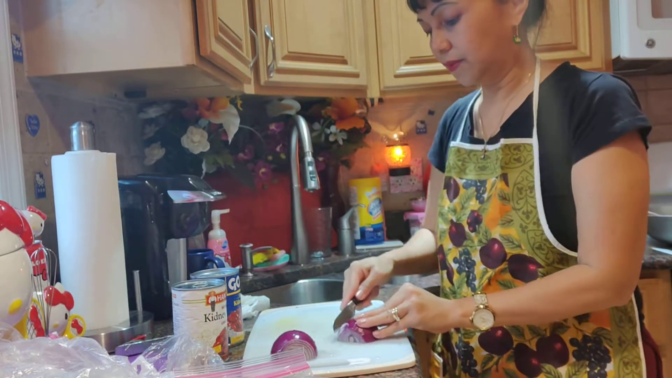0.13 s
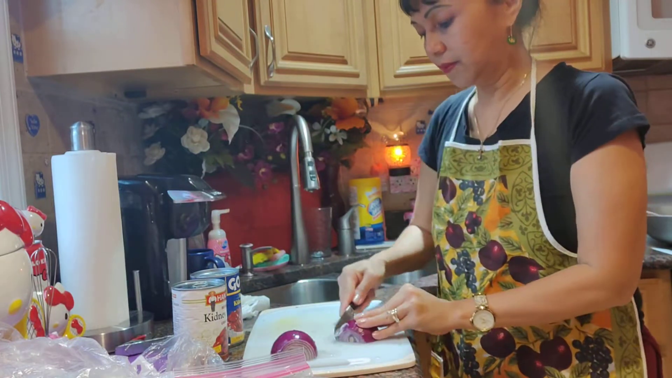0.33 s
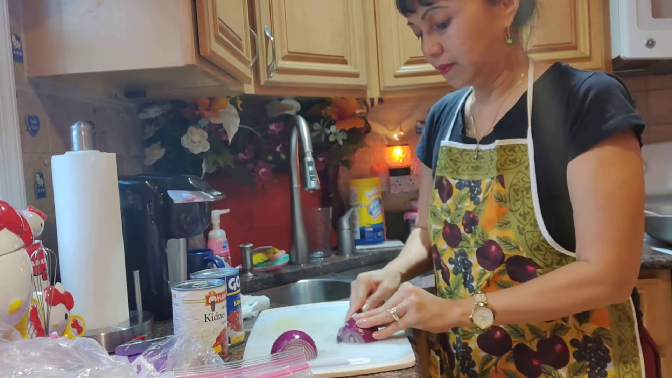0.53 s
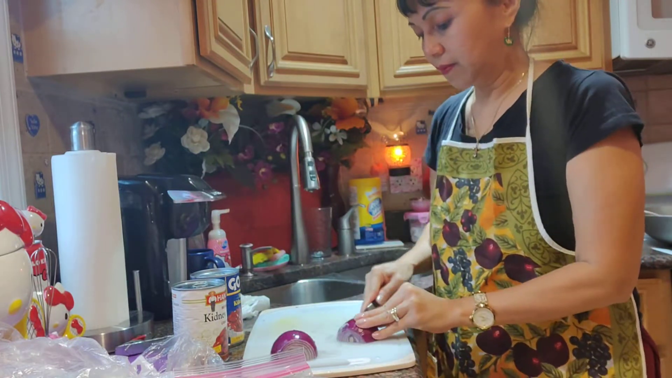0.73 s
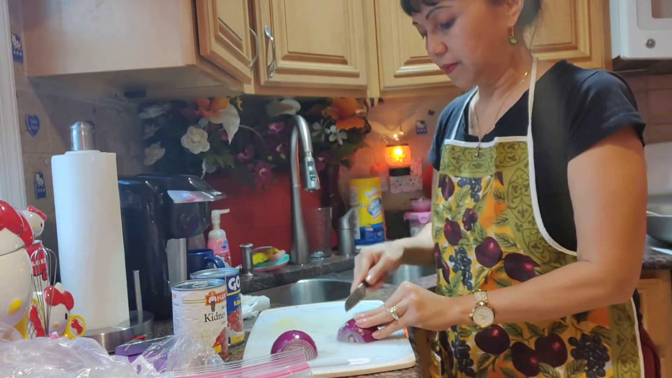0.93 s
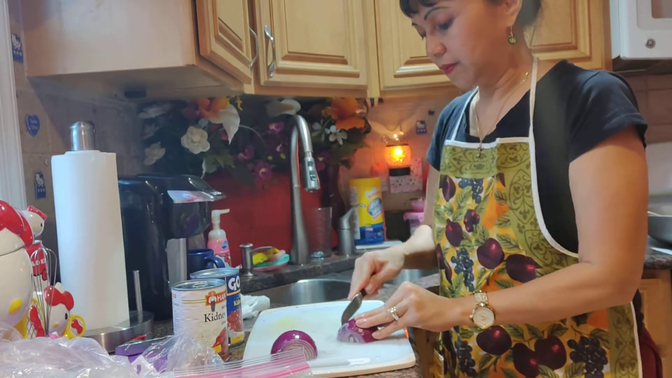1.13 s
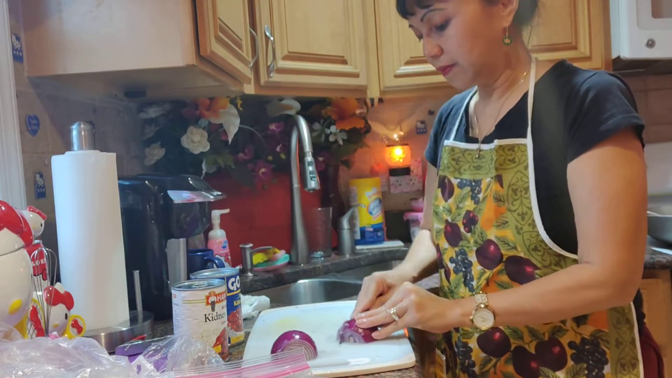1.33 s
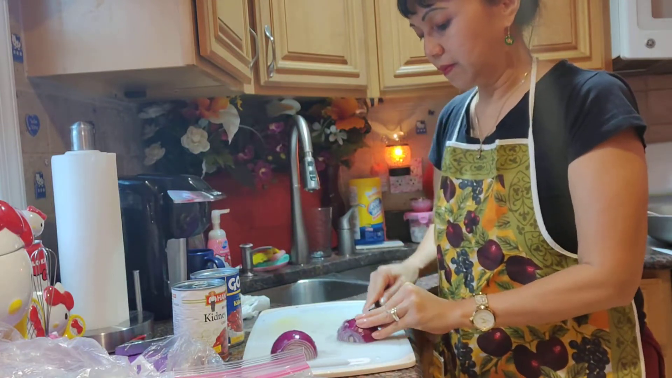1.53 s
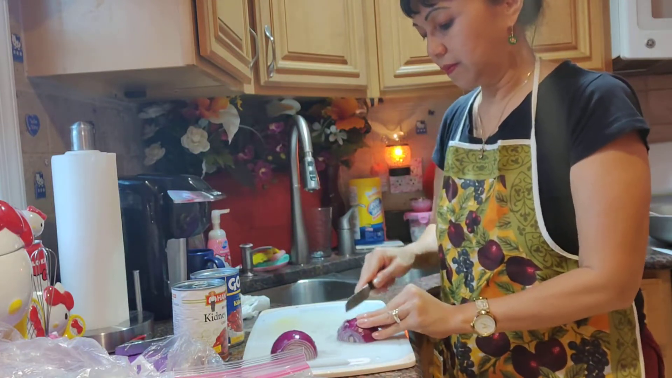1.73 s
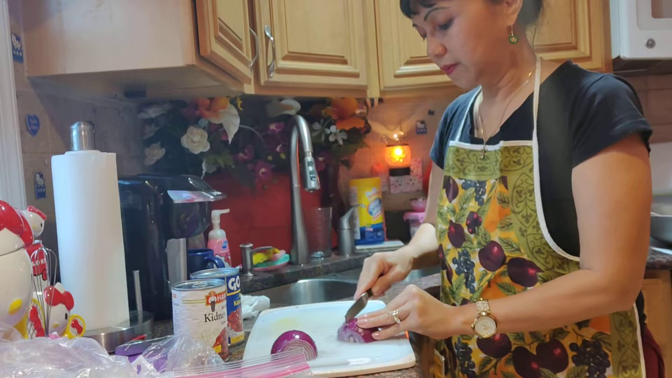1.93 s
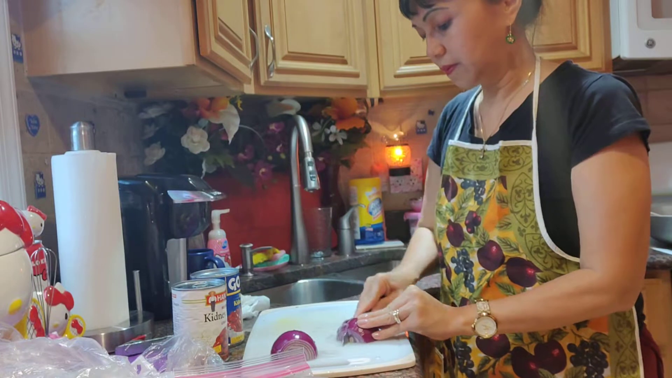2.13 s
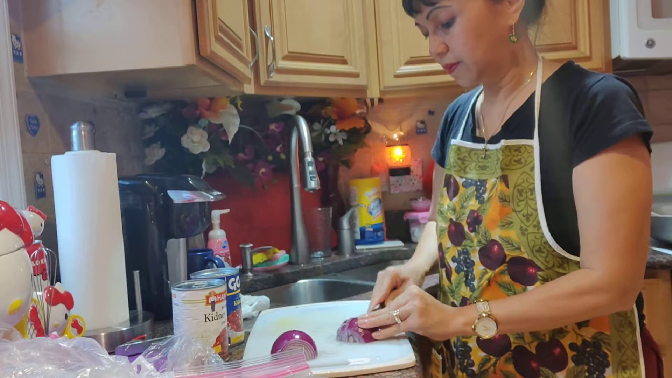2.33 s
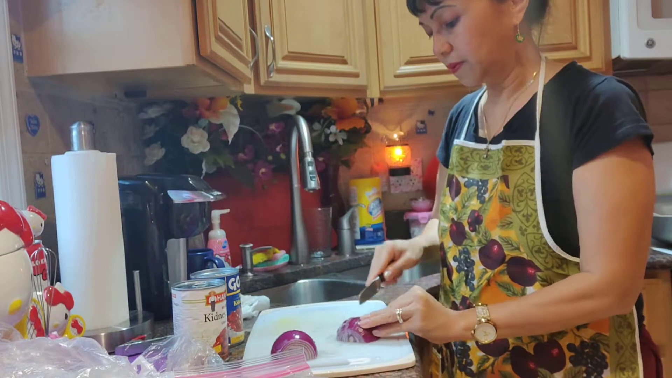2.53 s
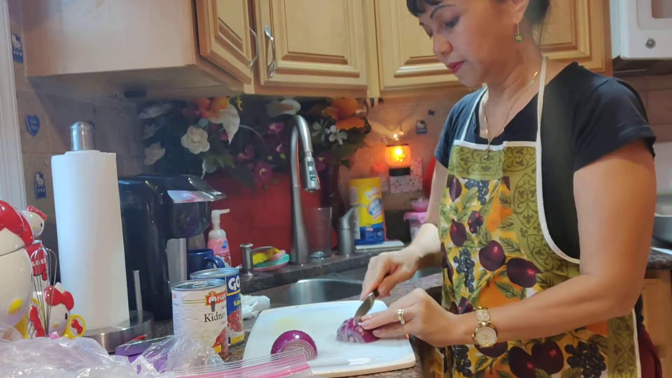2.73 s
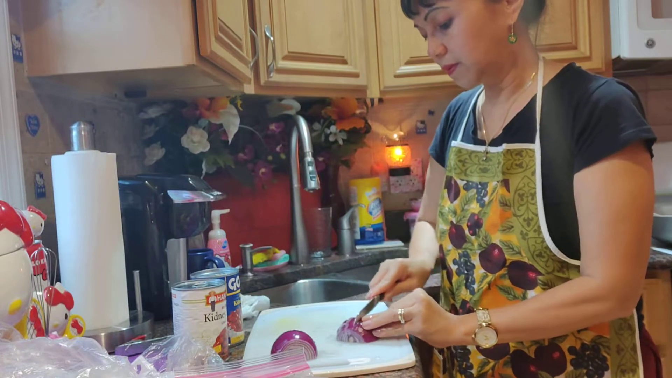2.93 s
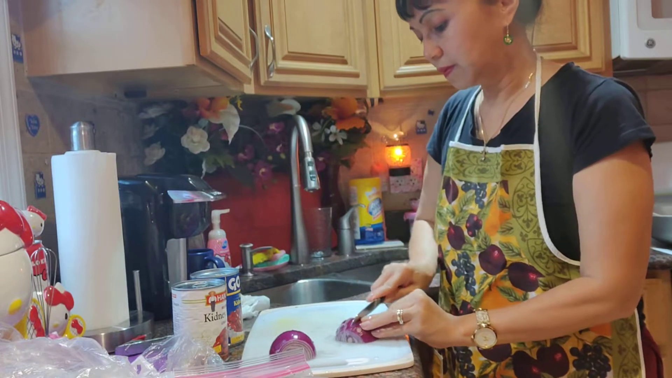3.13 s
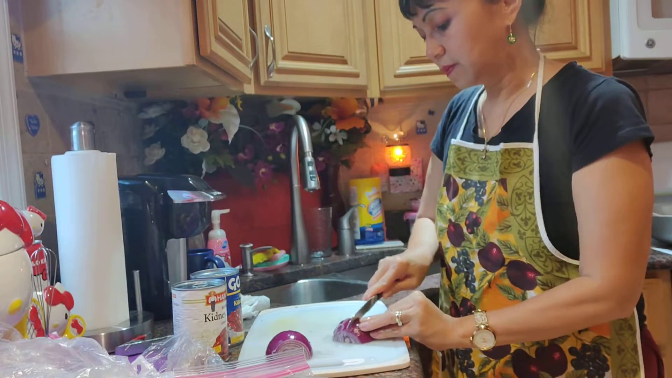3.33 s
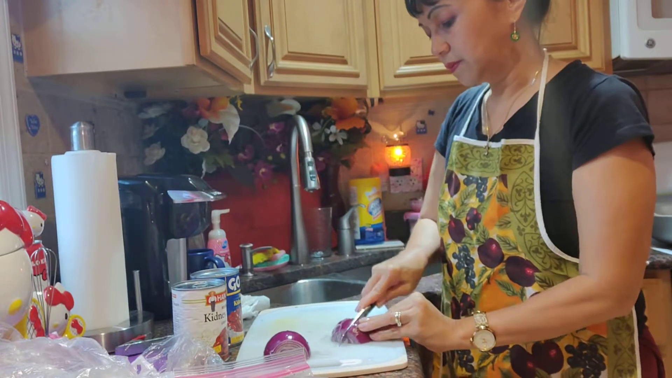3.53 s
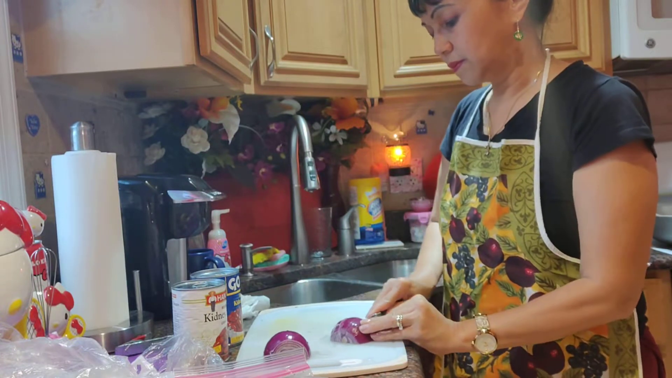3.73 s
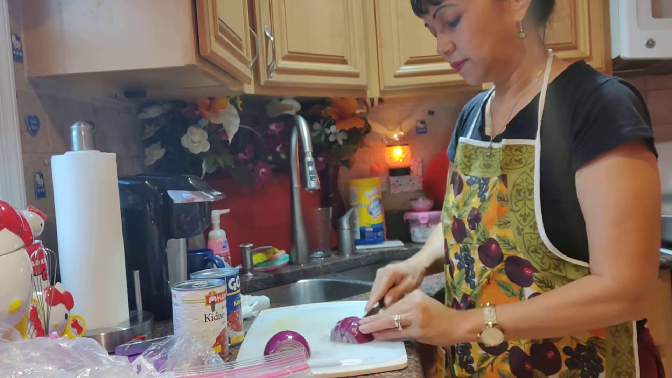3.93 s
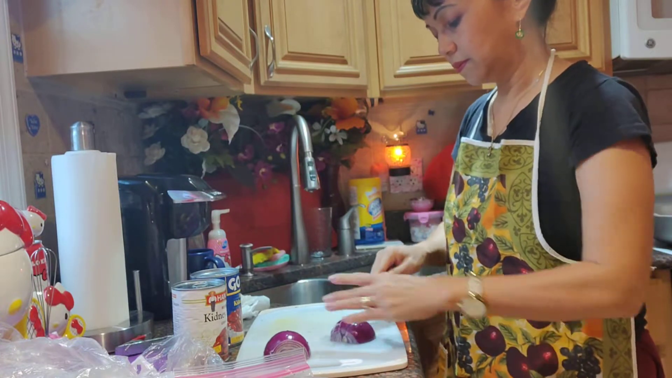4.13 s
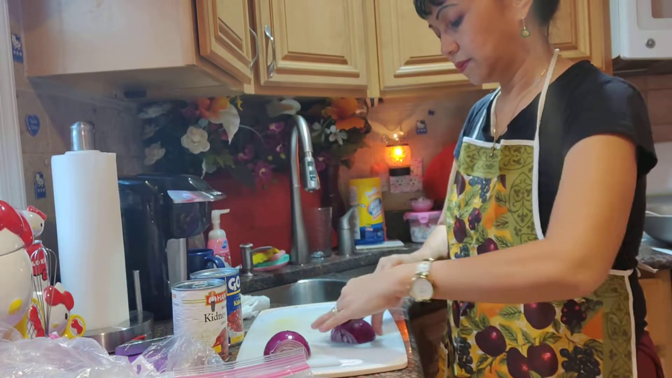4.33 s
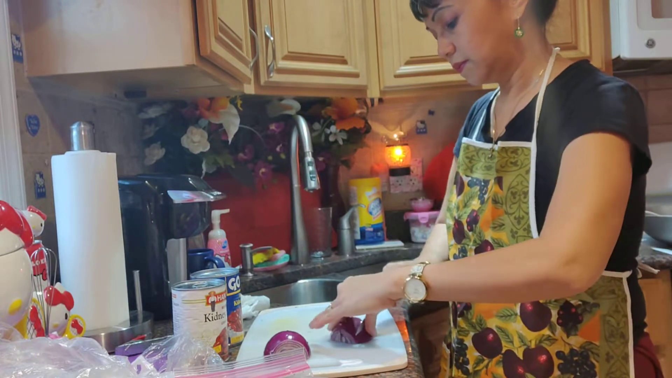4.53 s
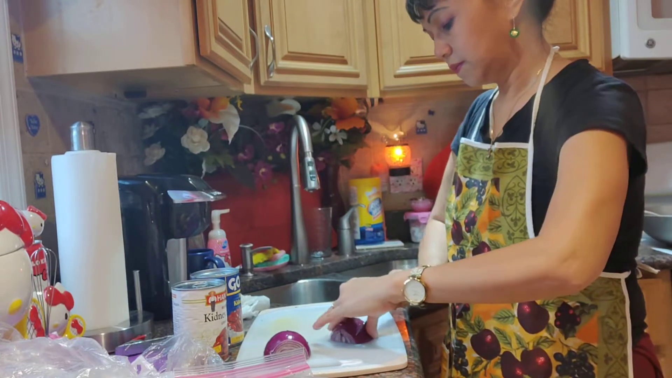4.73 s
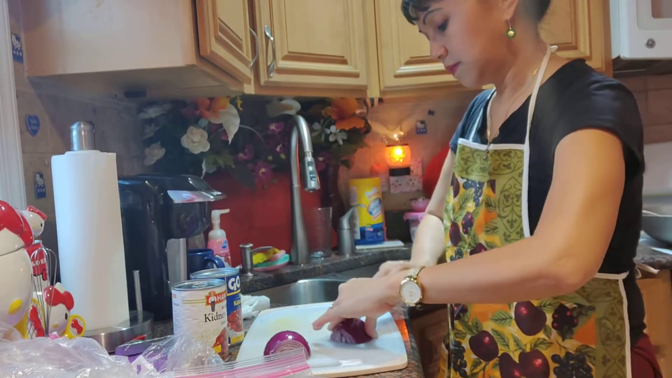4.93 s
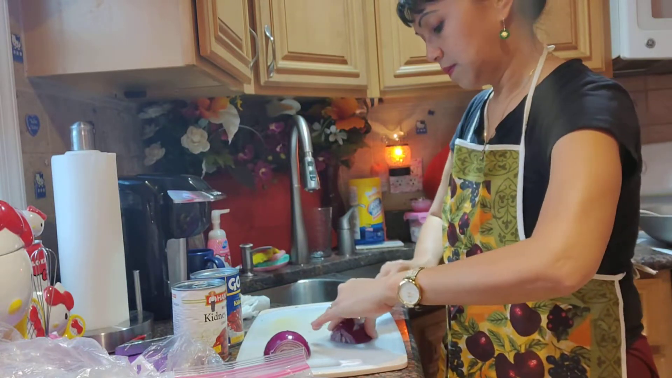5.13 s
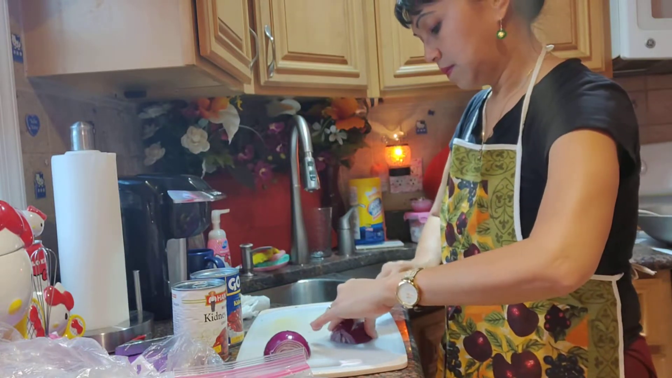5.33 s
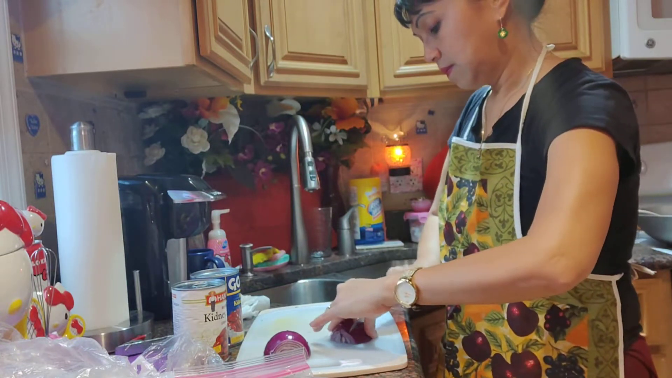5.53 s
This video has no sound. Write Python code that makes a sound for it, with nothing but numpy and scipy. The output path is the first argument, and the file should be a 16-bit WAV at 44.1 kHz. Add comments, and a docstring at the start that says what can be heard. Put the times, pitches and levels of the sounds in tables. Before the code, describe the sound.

Four spaced onion slices snap, crunch and knock on a cutting board, then small faint contacts follow over quiet hum and hiss.

```python
"""Faint contacts are heard first, over a low hum and hiss; then a knife slices an onion on a plastic board.
Layers snap as brief clicks with crackle, and cells burst in a crunch of small damped rings over friction noise.
The blade rings the board and drags back out as resonant friction; low thumps of the counter lie beneath.
A small hard kitchen adds echoes and a diffuse tail, heard at an arm's length by a two-port microphone."""
import sys
import numpy as np
from scipy import signal
from scipy.io import wavfile
from scipy.ndimage import uniform_filter1d

SR = 44100
rng = np.random.default_rng(int(sys.argv[2]) if len(sys.argv) > 2 else 0)


def to_wav(s):
    """Save 16-bit WAV."""
    ch = np.atleast_2d(s).T  # columns
    pcm = np.round(np.clip(ch, -1, 1) * 32767)  # PCM
    wavfile.write(sys.argv[1], SR, pcm.astype(np.int16))


N = 250929

# spectrum of the torn onion flesh: f/Hz, relative level/dB
FLESH = [(150, -21.5), (400, -5.5), (700, -5), (1200, -7), (2200, -7.5), (3100, -7), (5500, -13),
         (9000, -19.5), (15000, -23)]


def gain_of(db):
    """Level to amplitude: 20 dB is a factor of ten."""
    return 10 ** (np.asarray(db) / 20)


def evened(x):
    """Normalisation to unit root mean square."""
    return x / np.sqrt(np.mean(x ** 2) + 1e-20)


def read(points, hz):
    """Interpolation of a curve on a logarithmic frequency axis."""
    f, value = np.transpose(points)
    return np.interp(np.log(hz + 1), np.log(f + 1), value)


def add(mix, s, sound):
    """Superposition: the sound joins the mix from time s."""
    part = mix[..., round(s * SR):][..., :sound.shape[-1]]
    part += sound[..., :part.shape[-1]]


def ring(hz, width, size=1500):
    """Damped mode after a soft blow: it swells, then dies, faster for a wider resonance; peak near 1."""
    u = np.pi * width * np.arange(size) / SR
    envelope = (u / 2) ** 2 * np.exp(2 - u)
    return envelope * np.sin(2 * u * hz / width)


def colour(x, points):
    """Minimum-phase filtering: the Hilbert transform of the log spectrum gives a causal response."""
    log_gain = read(points, np.fft.rfftfreq(4096, 1 / SR)) * np.log(10) / 20
    mirrored = np.r_[log_gain, log_gain[-2:0:-1]]
    spectrum = np.exp(signal.hilbert(mirrored).conj())
    return signal.oaconvolve(x, np.fft.ifft(spectrum).real[:2048])[:len(x)]


def diffuse(frames, shape, size):
    """Diffuse field: random short-time spectra, alike left and right in the bass; shape(hz) gives the gain."""
    # left-right likeness of diffuse sound: f/Hz, correlation
    likeness = [(60, 1), (130, 0.92), (290, 0.94), (640, 0.35), (1410, -0.29), (3100, 0.014),
                (6820, -0.097), (15000, -0.26)]
    hz = np.fft.rfftfreq(size, 1 / SR)[:, None]
    a, b, c, d = rng.standard_normal((frames, len(hz), 4)).T
    same = read(likeness, hz)
    left = a + 1j * b
    right = same * left + np.sqrt(1 - same ** 2) * (c + 1j * d)
    spectra = np.array([left, right]) * shape(hz)
    return signal.istft(spectra, nperseg=size, noverlap=size * 3 // 4)[1]


def room_tone():
    """Stationary noise: appliance rumble in low room modes, under hiss; both vary a little in patches."""
    # rumble spectrum: f/Hz, relative density level/dB
    rumble = [(15, -11.5), (22, -7), (35, -14), (52, -2.5), (66, -1.5), (86, -14.5), (112, 2), (122, -1.5),
              (136, -8.5), (154, 0.3), (185, -15), (250, -12.5), (325, -12), (385, -17.5), (450, -20.5)]
    # hiss spectrum: f/Hz, relative density level/dB
    hiss = [(240, -29), (400, 1.5), (467, -8), (512, -4), (545, -4), (655, -16.5), (697, -11), (964, -11.5),
            (1220, -19), (2470, -22.5), (4110, -30.5), (4950, -27), (6050, -33), (13900, -30), (16000, -27)]
    # stereo tilt of the room tone: f/Hz, left minus right level/dB
    air_tilt = [(60, -3), (150, -2), (380, 0.5), (950, 0), (2380, 0), (5980, 1), (15000, -0.5)]
    lean = np.array([.5, -.5])[:, None, None]

    def noise(points, is_low, level_db, size, patchy_db):
        """Shaped noise on one side of 420 Hz, its level varying over frequency and time."""
        frames = 4 * N // size + 5
        patches = rng.standard_normal((frames, size // 2 + 1)).T
        patches = uniform_filter1d(patches, size=8, axis=0)
        patches = evened(uniform_filter1d(patches, size=4, axis=1))

        def shape(hz):
            inside = (hz < 420) == is_low
            return inside * gain_of(read(points, hz) + patchy_db * patches + lean * read(air_tilt, hz))
        return gain_of(level_db) * evened(diffuse(frames, shape, size=size)[:, :N])

    low = noise(rumble, True, level_db=-54, size=8192, patchy_db=1.2)
    return low + noise(hiss, False, level_db=-67, size=2048, patchy_db=.8)


def thumps():
    """Modal excitation: low thumps of the counter's modes, under the pushes and the blade's landings."""
    # low thumps: t/s, level/dB, centre of the modes reached f/Hz
    low_thumps = [(0.441, -49.5, 150), (1.292, -49, 152), (1.371, -42.5, 100.2), (1.39, -47.5, 290.7),
                  (2.119, -48.5, 150), (2.158, -41.5, 120), (2.179, -42.5, 162), (2.202, -46, 325),
                  (2.226, -49.5, 60), (3.47, -47, 153), (3.496, -41, 162), (3.524, -41, 108),
                  (3.528, -44.5, 340), (3.546, -43.5, 263.6), (3.6, -50.5, 62)]
    # counter modes: f/Hz, level/dB, nominal decay time t60/s
    modes = [(60, 0.1, 0.14), (101, 0, 0.078), (155, -1.1, 0.078), (252, -1.8, .05), (340, -1.8, .045)]
    reach_db_per_octave = 16.5
    out = np.zeros(N)
    for s, db, centre_hz in low_thumps:
        for hz, mode_db, t60 in modes:
            reach_db = -reach_db_per_octave * abs(np.log2(hz / centre_hz))
            add(out, s, gain_of(db + mode_db + reach_db) * ring(hz, 4.9 / t60, size=12000))
    return out


def drags():
    """Resonant friction: the blade drags out, its noise in one broad band that sags in pitch with the gap."""
    # flat of the blade dragging out after each slice: t/s, length/s, level/dB, pitch of the gap f/Hz
    pulls = [(.63, 0.17, -67, 1147), (1.559, .13, -67.5, 1225), (2.281, 0.211, -61, 1277),
             (3.632, 0.17, -57.5, 1212)]
    peak_at, start_db, end_db = 0.38, -8, -14.5  # share of the drag; ends relative to the peak
    gap_sag = 0.1993  # pitch drop over the drag, as a share
    out = np.zeros(N)
    for s, length, db, hz in pulls:
        u = np.arange(0, length, 1 / SR) / length
        band = rng.standard_normal(len(u)) + 1j * rng.standard_normal(len(u))
        band = signal.lfilter(*signal.butter(1, 220, fs=SR), band)
        pitch = hz * (1 - gap_sag * (u - .5))
        rub = (band * np.exp(2j * np.pi * np.cumsum(pitch) / SR)).real  # noise band moved up to the pitch
        swell_db = np.interp(u, [0, peak_at, 1], [start_db, 0, end_db])
        add(out, s, gain_of(db + swell_db) * evened(rub) * signal.windows.tukey(len(u), .3))
    return out


def knocks():
    """Impact and modal response: a short blow of the blade rings the damped plastic board."""
    # blade landings: t/s, level/dB, hardness added to modes above 2 kHz/dB
    blows = [(0.466, -34.5, -2), (1.3896, -15, 4.5), (2.1984, -24, -2), (3.5357, -29.5, 5.5),
             (3.5400, -22.5, -1)]
    # board modes: f/Hz, width/Hz, level/dB
    modes = [(1007, 370, -11), (1300, 1000, 7.5), (3400, 1100, -3.5), (4900, 1200, -8), (7090, 700, -23.5)]
    out = np.zeros(N)
    for s, db, hard_db in blows:
        blow = sum(gain_of(mode_db + hard_db * (hz > 2000)) * ring(hz, width) for hz, width, mode_db in modes)
        add(out, s, gain_of(db) * blow)
    return out


def crunch():
    """Random impulses: bursting cells of uneven size, pitch and place, over wet friction noise."""
    # crunch of slicing and pulling out, and short crackling ticks: start t/s, stop t/s,
    # fizz at start/dB, fizz at stop/dB, weight added below 2.2 kHz/dB, spray added above 10.5 kHz/dB
    crunches = [(0.341, 0.39, -65, -79, 2, 8), (0.394, 0.464, -69.5, -56, 1, 1),
                (0.594, 0.776, -77.5, -85, -3.5, -11), (1.256, 1.262, -69, -82, 11, -.4),
                (1.298, 1.376, -68, -53.5, 0.6, 1.95), (1.387, 1.424, -47, -57, -6.5, -2),
                (1.453, 1.661, -68.5, -85, 4.5, 3.5), (2.065, 2.192, -71.5, -52, -0.2, 2),
                (2.285, 2.469, -71, -83.5, -0.5, -1.3), (3.085, 3.150, -62.5, -79.5, -7.5, -4),
                (3.432, 3.43, -71, -76.5, 3, 1), (3.474, 3.52, -68, -68.5, -1, .1),
                (3.516, 3.536, -56.5, -45.5, -2.5, 4.5), (3.606, 3.680, -75.5, -61.5, 1.5, -10),
                (3.696, 3.755, -61.5, -66, -6.5, -5), (5.499, 5.522, -65, -79, -7, 3),
                (5.554, 5.636, -75.5, -89, 0, -5)]
    bite_s, settle_db_per_s = 0.0093, 301  # the fizz sets in, and dies away after the stop
    bursts_per_s = 2500
    heights = gain_of(4.3 * np.minimum(rng.exponential(1, N), 3))
    bursts = heights * (rng.random(N) < bursts_per_s / SR) * rng.choice([-1, 1], N)
    kind = rng.integers(0, 12, N)
    pitches = np.geomspace(600, 14000, num=12)
    pans = rng.uniform(-1, 1, 12) * 0.64
    cells = np.zeros((2, N))
    for k, hz in enumerate(pitches):
        pop = ring(hz, 0.67 * hz, size=300) * hz / 4000
        cells += signal.oaconvolve(bursts * (kind == k), pop)[:N] * [[1 + pans[k]], [1 - pans[k]]]
    shared, own = rng.standard_normal(N), rng.standard_normal((2, N))
    raw = evened(cells) + 0.63 * shared + 0.62 * own
    whole = np.array([colour(v, FLESH) for v in raw])
    fizz = signal.lfilter(*signal.butter(3, 7500, "high", fs=SR), whole)  # the reference for level
    body = signal.lfilter(*signal.butter(2, 2200, fs=SR), whole)
    spray = signal.lfilter(*signal.butter(3, 10500, "high", fs=SR), whole)
    t, out = np.arange(N) / SR, np.zeros((2, N))
    for start, stop, start_db, stop_db, body_db, spray_db in crunches:
        on = (t > start) & (t < stop + .25)
        db = np.interp(t[on], [start, stop], [start_db, stop_db])
        db = db - settle_db_per_s * np.maximum(t[on] - stop, 0)
        level = gain_of(db) * np.minimum((t[on] - start) / bite_s, 1)
        balanced = whole[:, on] + body[:, on] * (gain_of(body_db) - 1) + spray[:, on] * (gain_of(spray_db) - 1)
        out[:, on] += level * balanced / fizz.std()
    return out


def snaps():
    """Fracture: each layer gives with a click and dying crackle, partly pitched by the piece that moves."""
    # snaps and small contacts: t/s, peak level/dB, pitch f/Hz, pitched share 0-1, left minus right level/dB
    breaks = [(0.0137, -57.5, 1770, 0.6, 3), (0.055, -61, 1170, 0.79, 5), (0.349, -42.5, 2960, 0.47, -1.1),
              (0.354, -52, 730, .8, -4), (0.3972, -38, 1190, 0.15, -4), (0.4335, -40, 1580, 0, -3),
              (.869, -60, 1720, 0.5, 2.1), (1.1057, -61.5, 2440, 0.5, .6), (1.2591, -40.5, 3140, .05, -3),
              (1.2736, -33.5, 1170, 0.34, -2.1), (1.314, -27.5, 3044, .3, 0.6),
              (2.0688, -40, 5000, 0.27, -4), (2.0875, -30, 4900, 0.25, -1), (2.1298, -31, 2580, 0.38, -2),
              (2.165, -36, 1600, 0.35, 14), (2.179, -32.5, 590, 0.5, 4), (2.188, -39, 1500, .8, 8),
              (2.7663, -57.5, 2570, 0.65, 0.1), (3.0912, -38, 3170, 0.53, -1.2),
              (3.1097, -43.5, 3150, .7, 2.1), (3.3345, -47.5, 3190, 0.33, 0.5),
              (3.4303, -37, 3050, 0.3, 0.6), (3.4707, -26.5, 3530, .27, 0.5),
              (3.4994, -25.5, 3400, 0.13, 2.1), (3.5197, -24.5, 3100, 0.34, -7),
              (3.6427, -39, 1580, 0.5, -6), (3.6831, -36, 5150, 0.45, 6), (3.99, -60.5, 1008, 0.52, 0.5),
              (4.041, -61, 4650, 0.35, -0.5), (4.0568, -53.5, 2965, .35, 2), (4.479, -59, 1390, .3, 0.5),
              (5.189, -66, 1730, 0.68, 1.5), (5.4766, -52.5, 3070, .05, -1.8),
              (5.5045, -45.5, 3300, 0.24, -2.5), (5.568, -33.5, 2570, 0.47, 0.5),
              (5.5672, -53.5, 1300, .76, 3.5)]
    loud_db, faint_db = -30, -62  # hard snaps are short, faint contacts rustle longer
    loud_s, faint_s = .004, .011  # decay time constants of the crackle
    out, t = np.zeros((2, N)), np.arange(3000) / SR
    draws = rng.standard_normal((len(breaks), 3000))
    for (s, db, hz, share, pan_db), z in zip(breaks, draws):
        length = np.interp(-db, [-loud_db, -faint_db], [loud_s, faint_s])
        crackle = .04 * z ** 3 * np.exp(-t / length)  # cubing makes the noise sparse
        crackle[0] += 1  # the click
        tone = np.convolve(crackle, ring(hz, .3 * hz, size=600))[:3000]
        snap = share * evened(tone) + (1 - share) * evened(colour(crackle, FLESH))
        side_db = np.array([[.5], [-.5]]) * pan_db
        add(out, s, gain_of(db + side_db) * snap / abs(snap).max())
    return out


def kitchen(x):
    """Room impulse response: direct sound, single echoes, then a diffuse tail that dies band by band."""
    # first reflections from counter, cupboards and wall: delay t/s, extra delay on the left/s, level/dB
    echoes = [(.0019, .0002, -5.5), (.0045, .0001, -4), (.0060, .0001, -3), (.0076, .0003, -13.5),
              (.0098, -.0003, -11.5), (0.0112, .0001, -9.5), (0.0131, -0.0066, -6.5), (.018, -0.0043, -9)]
    # reverberation time: f/Hz, t60/s
    decay_times = [(100, 0.33), (500, 0.23), (1500, .24), (5000, 0.27), (12000, .16)]
    # colour of all reflected sound: f/Hz, level/dB
    walls = [(100, 9.5), (650, -4), (1000, -1), (1500, 0.9), (2500, -5), (3400, -5.5), (4600, 1.5),
             (5500, 1), (8000, 0), (15000, -6.5)]
    tail_db, onset_s = -2.5, 0.021  # tail level before the wall colour; its fade-in
    right_late_s = .00003
    frames = 300
    t = np.arange(frames) * 64 / SR
    tail = diffuse(frames, lambda hz: gain_of(-60 * t / read(decay_times, hz)), size=256)
    at = np.arange(tail.shape[1])
    tail = tail * np.clip(at / SR / onset_s, 0, 1)
    taps = gain_of(tail_db) * tail / np.linalg.norm(tail[0])
    for s, later, db in echoes:
        taps += gain_of(db) * np.sinc(at - np.array([[s + later], [s]]) * SR)  # sinc: fractional delay
    taps = np.array([colour(v, walls) for v in taps])
    taps += np.sinc(at - 4 - np.array([[0], [right_late_s]]) * SR)  # direct sound
    return signal.fftconvolve(x, taps, axes=1)[:, :N]


def ports(x):
    """Housing resonance: the microphone body colours both ports near five kilohertz, more on the left."""
    # response common to both ports: f/Hz, level/dB
    response = [(200, 8.5), (1700, -0.52), (2350, -1), (3000, 0.9), (3700, 2.5), (4200, -7), (4600, -0.5),
                (5050, 4.5), (5400, -0.5), (5900, -3), (9000, -3.5)]
    # difference between the ports: f/Hz, left minus right level/dB
    port_tilt = [(100, -3), (300, 2), (1000, -1.5), (2500, 1), (4000, 2.5), (5000, 8.5), (6500, -9),
                 (9000, -2.5), (15000, -2)]
    hz = np.geomspace(50, 16000, num=400)
    curves = [np.c_[hz, read(response, hz) + side * read(port_tilt, hz)] for side in (.5, -.5)]
    return np.array([colour(v, curve) for v, curve in zip(x, curves)])


def scene():
    """Superposition: blade and onion through the room, thumps added at the ports, room tone beneath."""
    near = knocks() + snaps() + crunch() + drags()
    # small things radiate no bass
    near = signal.sosfilt(signal.butter(3, 600, "high", fs=SR, output="sos"), near)
    return ports(kitchen(near) + thumps()) + room_tone()


def record(dry):
    """Band limitation: a linear-phase low-pass removes the highest treble."""
    edge_hz = 15850
    lowpass = signal.firwin(511, edge_hz, window=("kaiser", 9), fs=SR)
    return signal.oaconvolve(dry, lowpass[None], "same")


dry = scene()
out = record(dry)
to_wav(out)
```